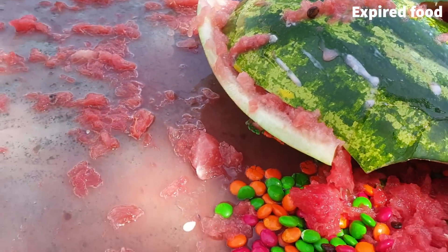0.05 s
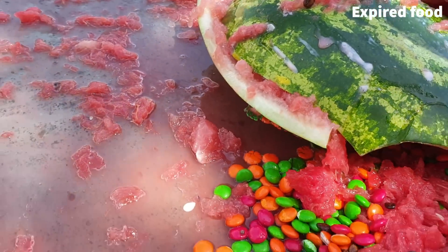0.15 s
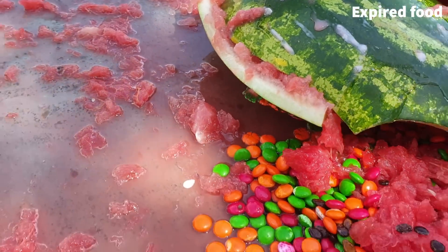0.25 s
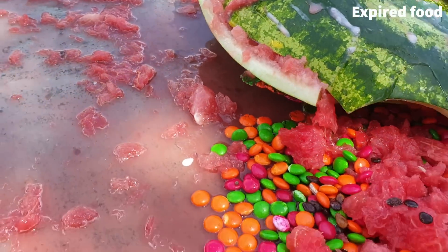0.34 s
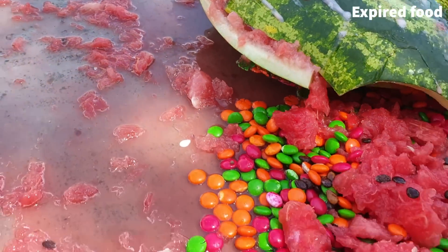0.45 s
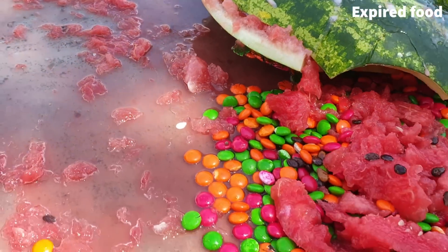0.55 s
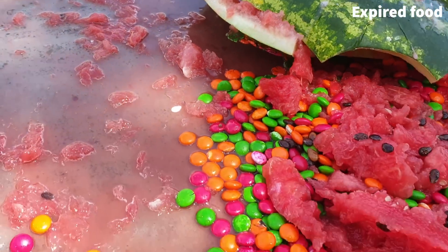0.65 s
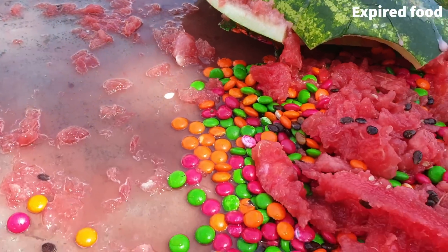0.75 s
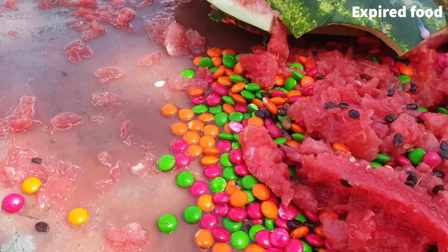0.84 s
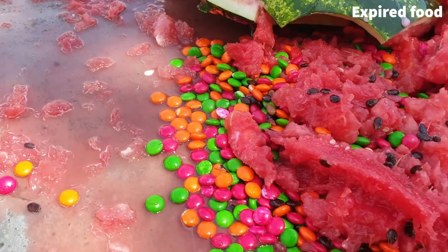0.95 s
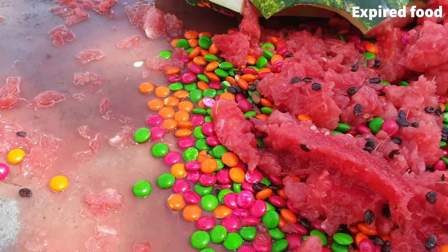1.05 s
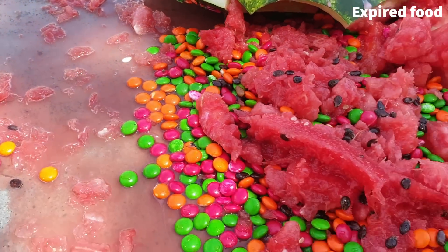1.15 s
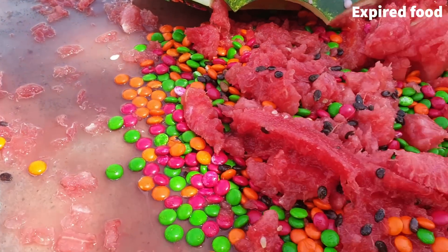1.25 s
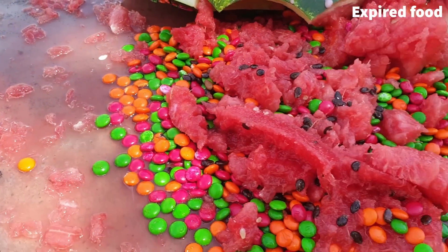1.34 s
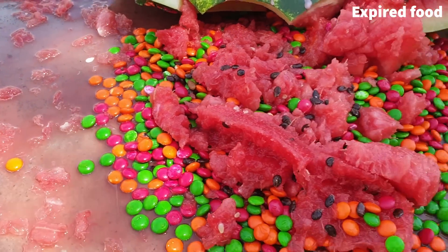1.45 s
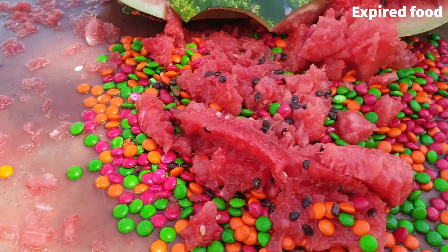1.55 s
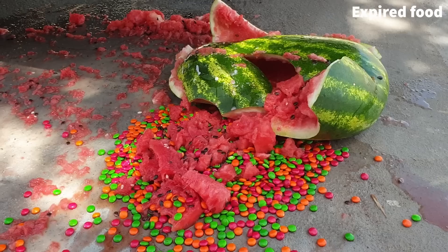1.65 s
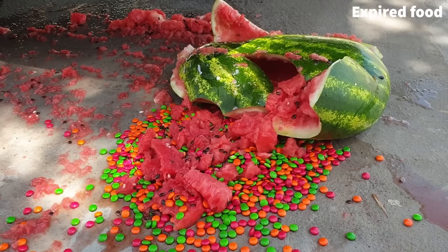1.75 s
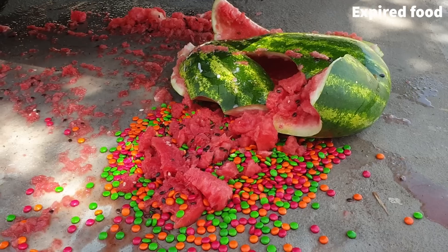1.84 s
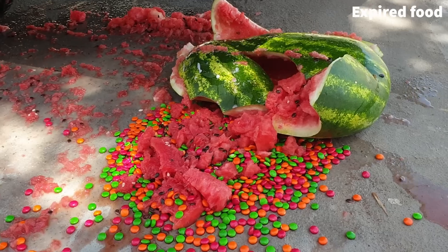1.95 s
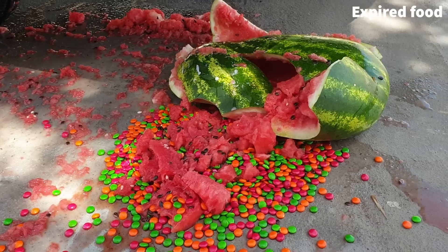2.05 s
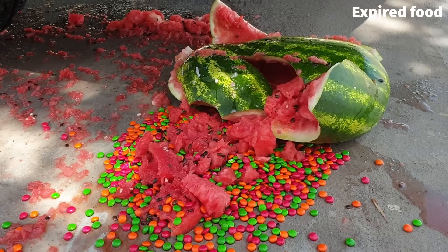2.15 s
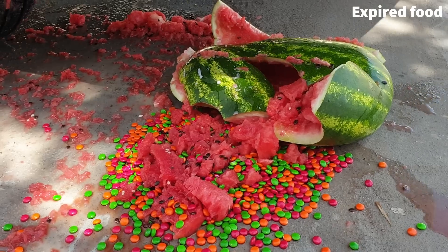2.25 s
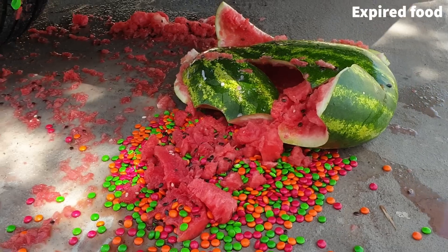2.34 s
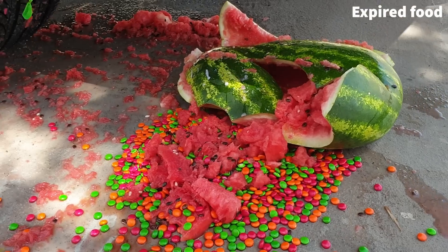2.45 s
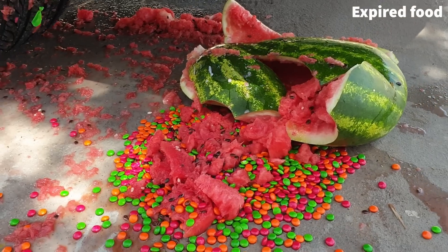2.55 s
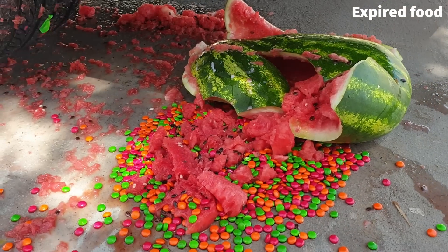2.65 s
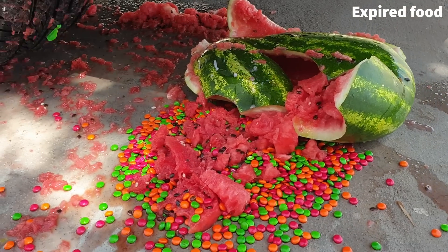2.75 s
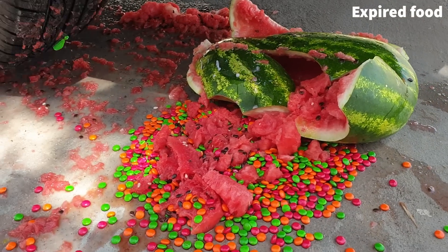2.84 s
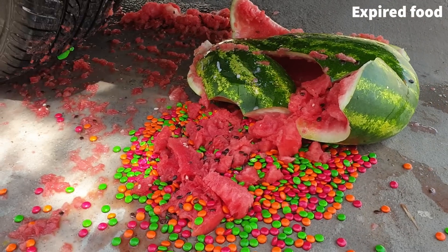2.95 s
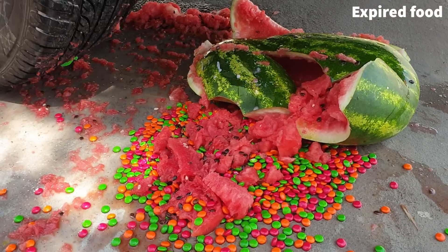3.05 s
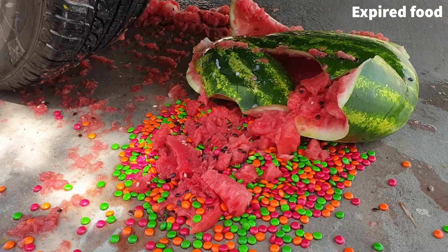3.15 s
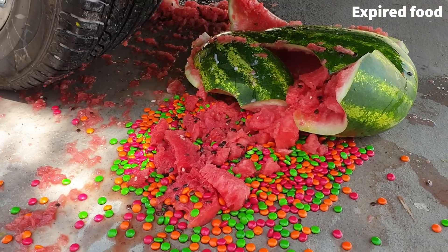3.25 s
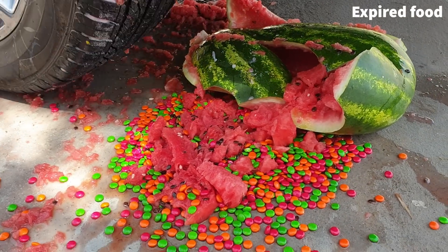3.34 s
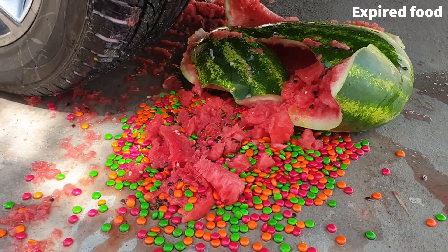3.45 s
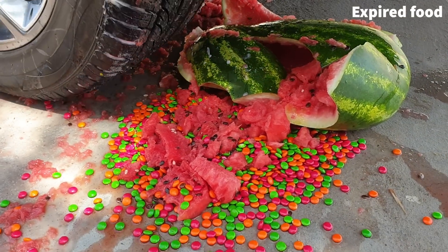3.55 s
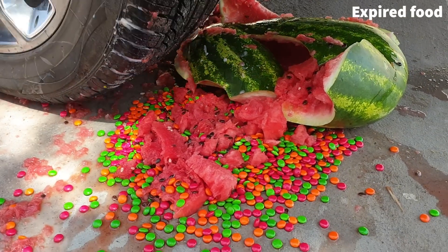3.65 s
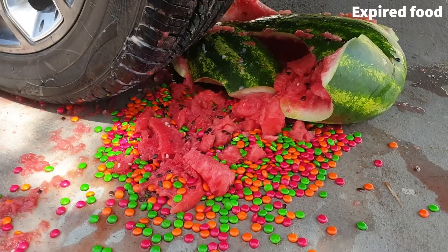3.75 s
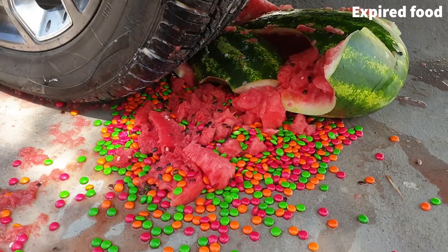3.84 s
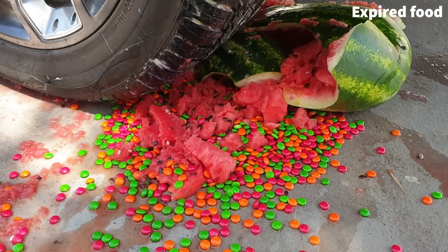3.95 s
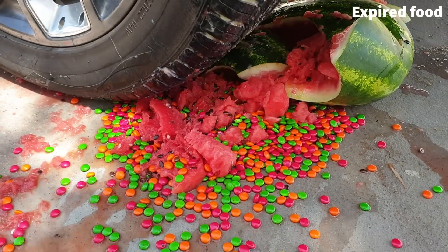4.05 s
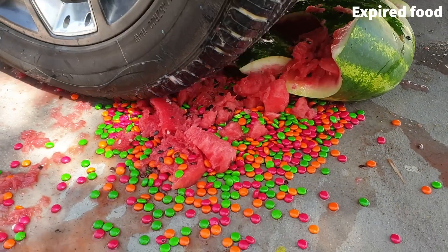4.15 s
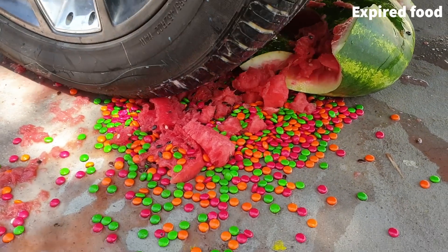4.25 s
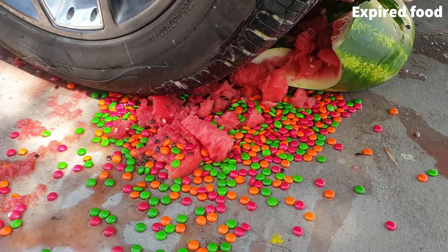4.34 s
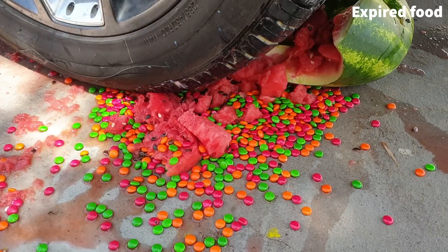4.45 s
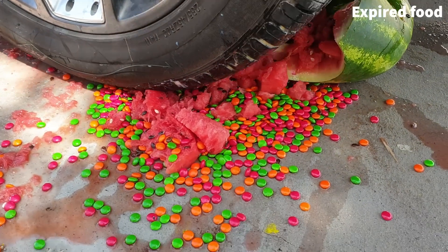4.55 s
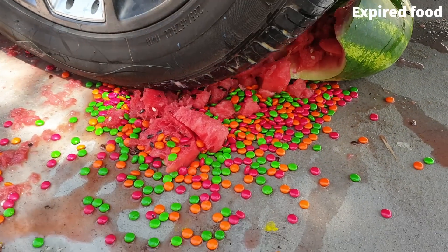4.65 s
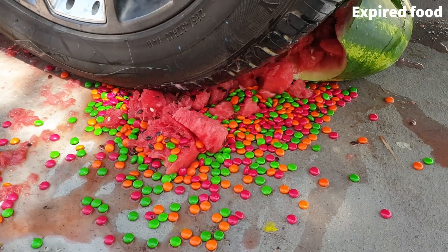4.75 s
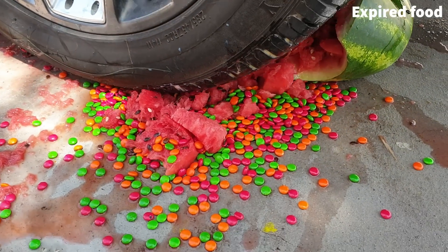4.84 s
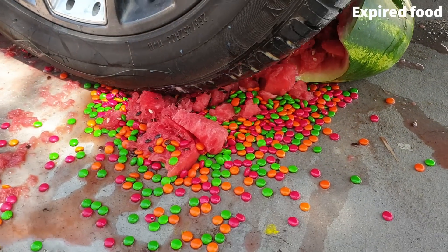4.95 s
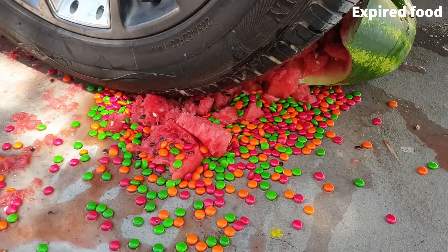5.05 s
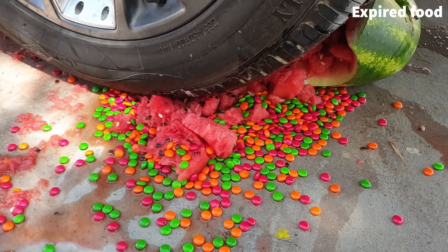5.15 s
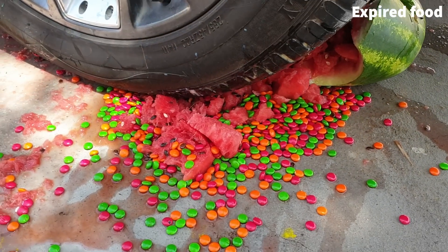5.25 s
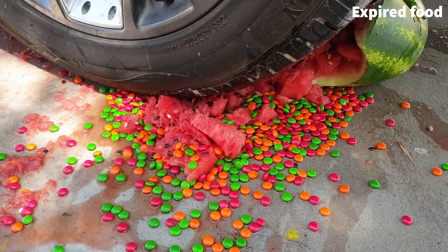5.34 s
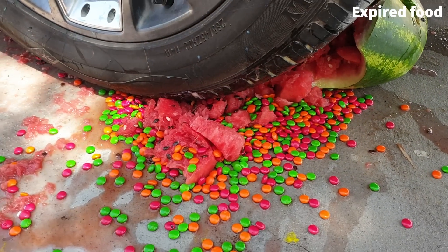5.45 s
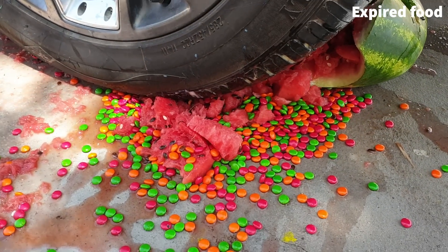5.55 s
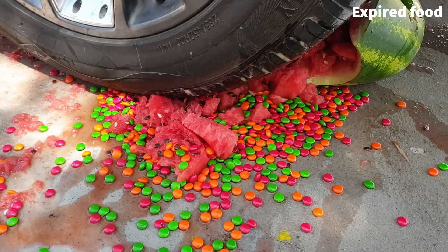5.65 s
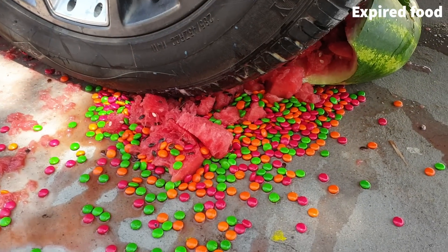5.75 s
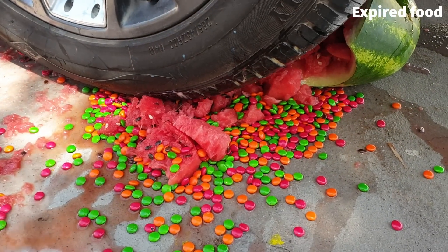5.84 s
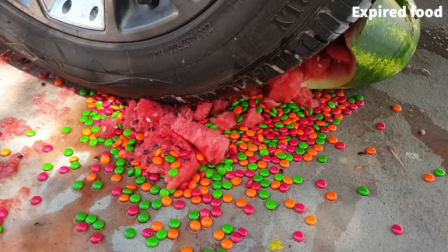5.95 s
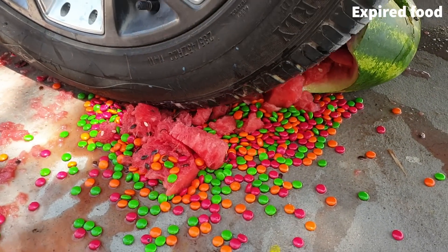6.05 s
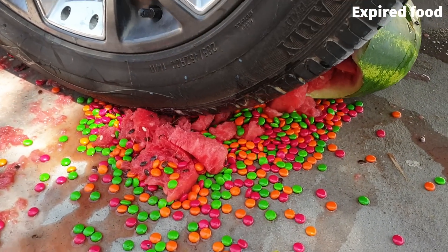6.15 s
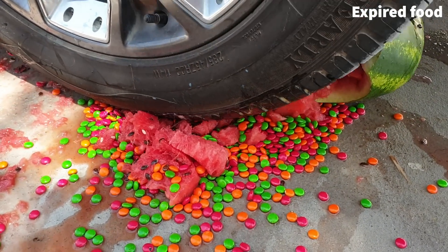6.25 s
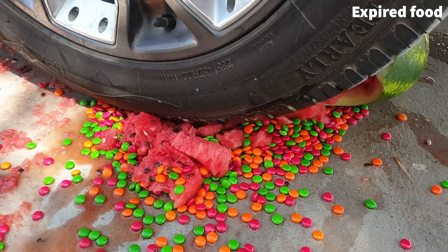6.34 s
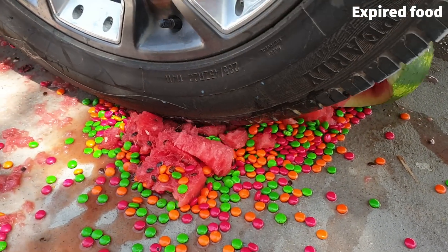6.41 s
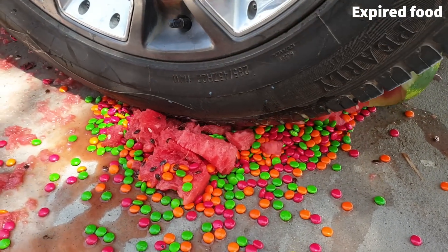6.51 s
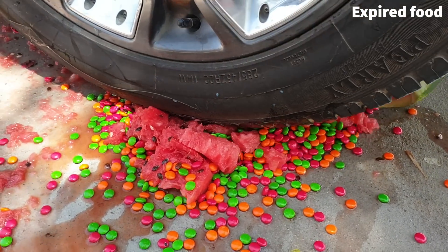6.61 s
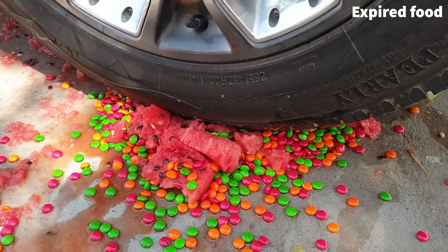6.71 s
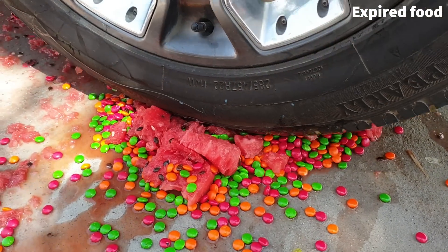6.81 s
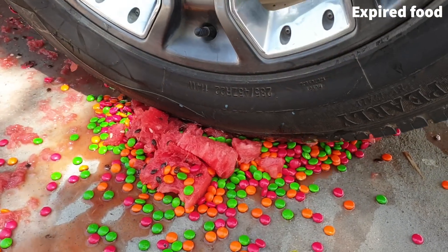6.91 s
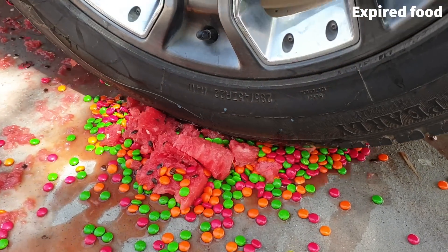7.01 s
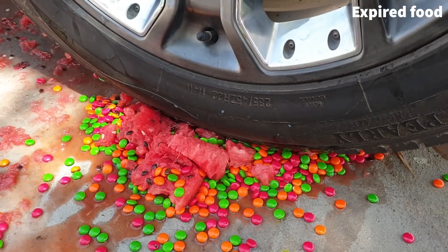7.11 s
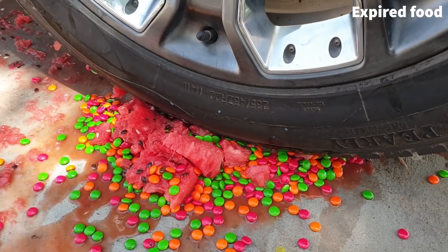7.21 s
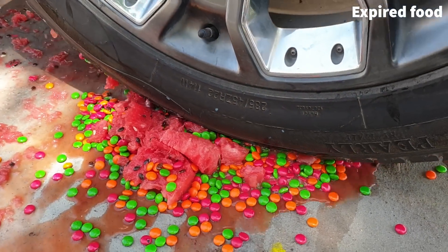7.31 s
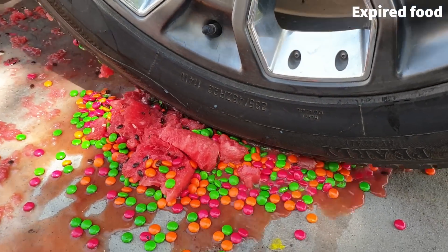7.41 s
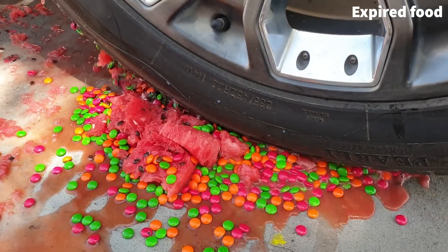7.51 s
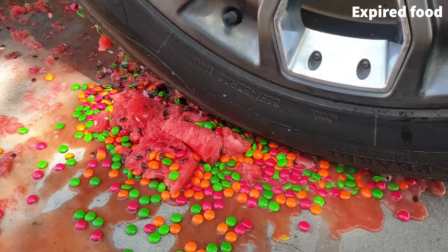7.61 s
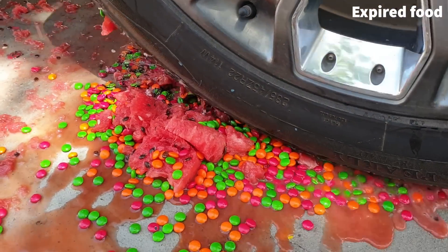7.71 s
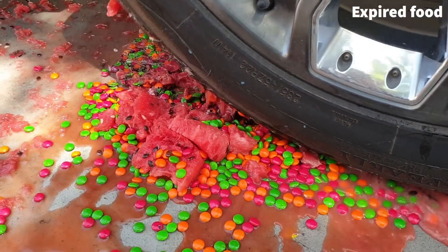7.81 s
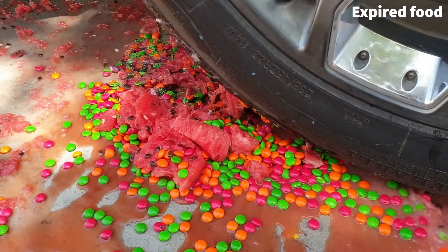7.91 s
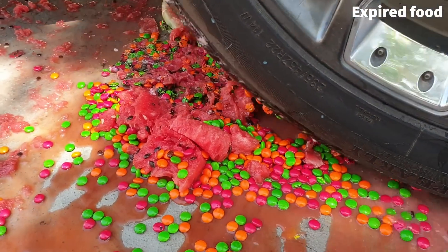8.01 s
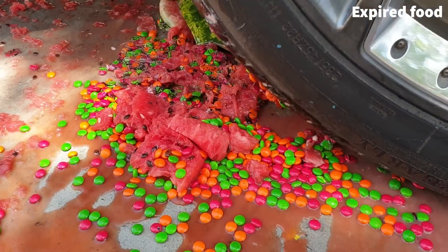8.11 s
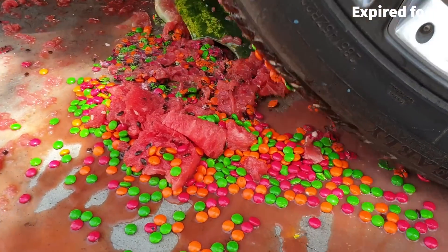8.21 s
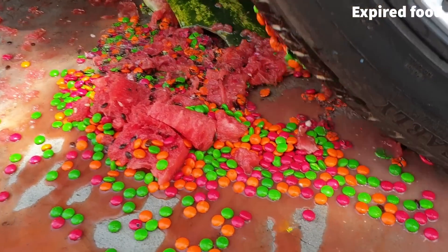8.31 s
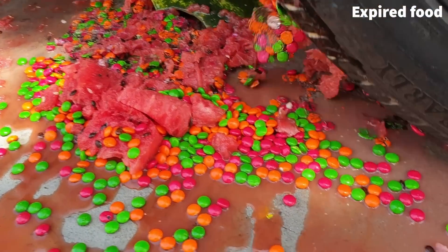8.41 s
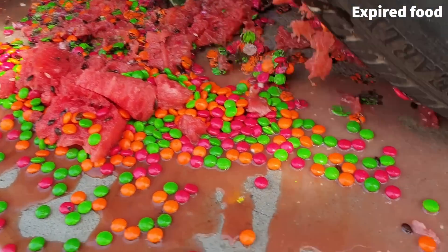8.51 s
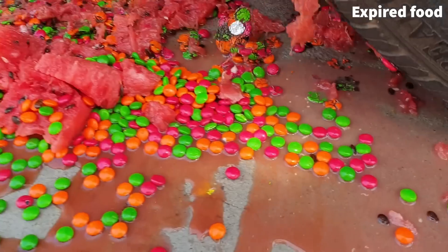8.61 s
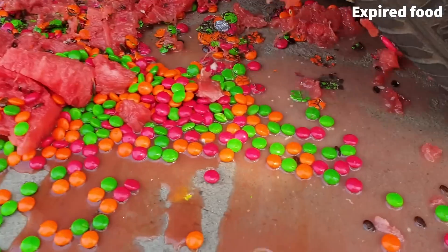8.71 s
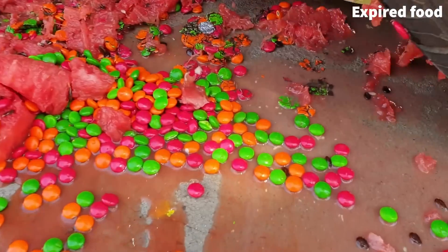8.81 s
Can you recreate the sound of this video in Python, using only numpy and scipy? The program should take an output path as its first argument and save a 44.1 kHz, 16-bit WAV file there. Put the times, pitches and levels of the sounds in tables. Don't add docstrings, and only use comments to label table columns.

```python
import sys
import numpy as np
from scipy import signal
from scipy.io import wavfile
from scipy.ndimage import uniform_filter1d

SR = 44100
rng = np.random.default_rng(int(sys.argv[2]) if len(sys.argv) > 2 else 0)


def undo_db(level):
    steps = np.asarray(level, float) / 20
    return 10 ** steps


def waveform_to_disk(signal):
    frames = np.transpose(np.atleast_2d(signal))
    scaled = np.clip(frames, -1, 1) * 32767
    samples = np.round(scaled).astype(np.int16)
    wavfile.write(sys.argv[1], SR, samples)


N = 391166
CUT_S = 1.68
PORT_LAG = (21, 13)
# time_s, level_db
THROTTLE = [(0, 0), (1.66, -4), (1.7, -1.5), (4.8, 1.5), (5.3, -2.5), (5.48, 4), (5.6, 11.5), (5.88, 16.5),
            (6.25, 10.5), (6.55, 6), (6.8, -2.5), (6.98, -1.5), (7.19, 12), (7.31, 1.5), (7.42, 11),
            (7.8, 3.5), (8.0, 1.5), (8.87, 2)]
# time_s, level_db
CRUSH = [(0, 4), (.6, 3.5), (1.62, 3.5), (1.75, 4.5), (2.25, 5.5), (2.6, 4.5), (3.88, 6), (4.05, 7),
         (4.3, 8.5), (4.5, 6.5), (4.75, 7.5), (4.95, 5), (5.75, 7.5), (6.82, 7), (7.3, 7.5), (7.55, 10.5),
         (7.86, 8.5), (8.1, 6.5), (8.87, 6.5)]


def in_time(rows, silent=False):
    s, *columns = np.transpose(rows)
    t = np.arange(N) / SR
    curves = [np.interp(t, s, column) for column in columns]
    if silent:
        curves.append(np.clip(np.minimum(t - s[0], s[-1] - t) / 0.0018, 0, 1))
    return curves


def at_hz(points, hz):
    points = np.array(points)
    return np.interp(np.log(hz), np.log(points[:, 0]), points[:, 1])


def before_change():
    return np.arange(N) < CUT_S * SR


def rms_one(x):
    return x / np.sqrt(np.mean(x ** 2) + 1e-20)


def drift(rate):
    r = np.exp(-32 * np.pi * rate / SR)
    slow = signal.lfilter([1], [1, -2 * r, r * r], rng.standard_normal(N // 16 + 4002))[4000:]
    return np.interp(np.arange(N) / 16, np.arange(len(slow)), rms_one(slow - slow.mean()))


def peak(x, hz, width_hz):
    r = np.exp(-np.pi * width_hz / SR)
    poles = [1, -2 * r * np.cos(2 * np.pi * hz / SR), r * r]
    return signal.lfilter([(1 - r * r) / 2, 0, (r * r - 1) / 2], poles, x)


def placed(x, pan_db, lag=PORT_LAG):
    first = before_change()
    late = np.where(first, *[np.roll(x, k) for k in np.broadcast_to(lag, 2)])
    lean = undo_db((pan_db + 1.3 * first) / 2)
    return np.array([x * lean, late / lean])


def tone(hz, level_db, gate, wobble_hz, flutter_db, rate, lead=0):
    turns = np.cumsum(hz + wobble_hz * drift(rate)) / SR
    level = undo_db(level_db + flutter_db * drift(rate))
    return np.sqrt(2) * gate * level * np.sin(2 * np.pi * turns + lead)


def hums():
    # time_s, pitch_hz, level_db
    rotors = [
        [(0.1, 625.5, -70), (0.524, 617.5, -62.5), (1.66, 627.5, -65)],
        [(1.7, 406, -67.5), (3.95, 404.2, -66.5), (4.9, 397.5, -74)],
        [(1.7, 244.3, -68), (4.05, 242.7, -72), (5.2, 240, -70)],
        [(7.3, 265.3, -65.5), (7.55, 260, -54), (7.8, 260.7, -63.5), (8.87, 263, -51.5)],
        [(6.45, 582, -66), (6.8, 550, -71), (7.05, 543, -68)],
        [(7.9, 533, -67), (8.87, 530, -75.5)],
        [(7.9, 924, -83.5), (8.87, 921, -69)],
        [(7.9, 2270, -69), (8.87, 2283, -71)],
        [(1.8, 438.7, -80), (5, 432.4, -72.5)],
    ]
    lines = [tone(*in_time(rotor, True), wobble_hz=2.45, flutter_db=2.0, rate=6.75) for rotor in rotors]
    return placed(sum(lines), 1.5)


def camshaft():
    # time_s, firing_hz
    firing_speed = [(0.0, 34.94), (0.43, 34.31), (1.67, 34.35), (1.69, 35.54), (2.08, 36.09), (3.2, 35.81),
                    (3.82, 36.41), (4.48, 36.1), (4.92, 35.08), (5.16, 35.36), (5.44, 37.9), (5.74, 51.31),
                    (5.99, 56.99), (6.31, 54.58), (6.81, 38.07), (7.12, 40.88), (8.08, 38.38),
                    (8.87, 39.88)]
    start_turns = (.106, .036)
    firing_hz = in_time(firing_speed)[0]
    return firing_hz, np.cumsum(firing_hz) / (8 * SR) + np.where(before_change(), *start_turns)


def engine_bay(cam):
    # pitch_hz, level_db (per Hz)
    colour_first = [(170, -7), (260, -7), (344, -14), (600, -9), (1130, -14), (1600, -10.5), (2300, -15.5),
                    (3100, -20.5), (4500, -28), (7200, -32), (10300, -28), (16000, -36.5)]
    # pitch_hz, level_db (per Hz)
    colour_second = [(170, -15), (258, -10.5), (331, -19.5), (392, -16.5), (749, -15.5), (1080, -19.5),
                     (2300, -16), (3900, -28), (6930, -33.5), (10100, -32), (16000, -37)]
    # pitch_hz, correlation (0-1)
    likeness = [
        [(60, .99), (300, .92), (800, .85), (2000, .78), (4500, .4), (14000, .35)],
        [(60, .99), (300, .9), (800, .62), (2000, .3), (4500, .2), (14000, .15)],
    ]
    # pitch_hz, pan_db
    leaning = [(60, 2.4), (2000, 2.6), (14000, 1.6)]
    # pitch_hz, level_db (in the band)
    rumble = [(28, -87), (50, -64), (100, -68), (140, -69)]
    bay_lag = (21, 9)
    # rest_db, follows_throttle (dB per dB), follows_crush (dB per dB)
    bay_law = [
        (-58, 0.41, 1.26),
        (-70, 0.41, 1.37),
        (-79.5, 0.2568, 1.7658),
    ]

    throttle_db, crush_db = in_time(THROTTLE)[0], in_time(CRUSH)[0]
    body_db, clatter_db, hiss_db = [db + a * throttle_db + b * crush_db for db, a, b in bay_law]
    first = before_change()
    grit_size = undo_db(2.5 * np.minimum(rng.exponential(1, N), 2.4))
    grit = 1 + 2.4 * (rng.random(N) < 400 / SR) * grit_size
    white = rng.standard_normal((2, 2, N)) * grit
    together = drift(21)
    beat = np.cos(2 * np.pi * 3 * cam)
    low_edges = 20 * 2 ** np.arange(0, 9.7, .4)
    high_edges = np.minimum(low_edges[1:], 16000)
    out = 0
    for k, (low, high) in enumerate(zip(low_edges, high_edges)):
        hz = np.sqrt(low * high)
        sos = signal.butter(2, [low, high], "band", fs=SR, output="sos")
        mid, side = signal.sosfilt(sos, white[k % 2])
        alike = (1 + np.where(first, *[at_hz(curve, hz) for curve in likeness])) / 2
        share = [at_hz([(450, a), (2000, b), (6000, c)], hz) for a, b, c in np.eye(3)]
        swell_db = share[0] * (body_db + 60) + share[1] * (clatter_db + 64) + share[2] * (hiss_db + 72)
        colour_db = np.where(first, at_hz(colour_first, hz), at_hz(colour_second, hz)) - 38
        if hz < 160:
            colour_db = at_hz(rumble, hz) - 10 * np.log10(2 * (high - low) / SR)
        patch_db = 1.4 * drift(10.2) + (0.36 * together + 1.9 * beat) * min(hz / 2500, 1)
        gain = undo_db(colour_db + swell_db + patch_db)
        pan_db = at_hz(leaning, hz)
        out = out + placed(gain * np.sqrt(alike) * mid, pan_db, bay_lag)
        out = out + placed(gain * np.sqrt(1 - alike) * side, pan_db, bay_lag) * [[1], [-1]]
    return out


def exhaust(firing_hz, cam):
    # pitch_hz, level_db
    pipe = [(47, -7), (58, 1.5), (80, 1.5), (95, -2), (103, -14.5), (109, -12.5), (119, -3), (142, -10.5),
            (162, -2)]
    # order, level_db
    order_sets = [
        [(8, 0)],
        [(16, 0)],
        [(11, 0), (13, 0)],
        [(19, 0), (21, -11), (24, 0), (27, -11), (29, -17), (32, -11)],
        [(44, 0), (54, -3), (88, 1), (109, -1), (126, -3)],
    ]
    # idle_db, follows_throttle (dB per dB), loss_db (per firing/s above the knee), coast_db (lost coasting)
    exhaust_law = [
        (-55, 1.45, 0, 2.5),
        (-45.5, 1.0037, 0.23, -1.5),
        (-51.5, 1.08, 0.01, 0.7),
        (-46.5, 1.0754, 1.38, 5),
        (-78.5, 0.8833, -0.67, 1),
    ]

    throttle_db = in_time(THROTTLE)[0]
    racing = np.maximum(firing_hz - 36.4, 0)
    slowing = uniform_filter1d(-np.gradient(firing_hz) * SR, size=4000)
    coasting = np.clip(slowing / 30, 0, 1)
    out = 0
    for (idle_db, follows, loss_db, coast_db), orders in zip(exhaust_law, order_sets):
        gains = np.array([undo_db(db + at_hz(pipe, order * firing_hz / 8)) for order, db in orders])
        part_db = idle_db + follows * throttle_db - loss_db * racing - coast_db * coasting
        gains = gains * undo_db(part_db) / np.sqrt(np.sum(gains ** 2, axis=0) / 2)
        for gain, (order, _) in zip(gains, orders):
            uneven = undo_db((.4 + order / 40) * drift(4))
            jitter = order / 200 * drift(4 + order / 10)
            out = out - gain * uneven * np.cos(2 * np.pi * order * cam + jitter)
    return placed(out, 2.7)


def crackle():
    sizes = undo_db(2.5 * np.minimum(rng.exponential(1, N), 3.0)) * rng.choice([-1, 1], N)
    born = rng.random(N) < 600 * undo_db(4 * drift(8)) / SR
    dealt = rng.integers(0, 10, N)
    out = 0
    for k, hz in enumerate(np.geomspace(600, 3300, num=10)):
        clicks = sizes * born * (dealt == k) + 1e-18
        ring = rms_one(peak(clicks, hz, 2.26 * hz / 9.2))
        out = out + placed(ring, (2, -1, 4)[k % 3], (12, -6, 3, -14)[k % 4])
    return undo_db(-87 + 3.44 * in_time(CRUSH)[0]) * rms_one(out)


def contact(burst, echo, s):
    # time_s, lag_samples
    contact_lag = [(1.6, 20), (2.2, -20), (2.9, 14), (4.3, 5), (6.4, -3), (7.9, -9)]
    lag = round(np.interp(s, *np.transpose(contact_lag)))
    return np.array([burst, .8 * np.roll(burst, lag) + .5 * echo])


def snaps():
    # start_s, peak_db, pitch_hz, crack_db, ring_s
    fractures = [(1.373, -62, 3000, -21, 0.043), (3.569, -64, 5450, -15, 0.065),
                 (2.215, -59, 1930, -27, 0.23), (2.969, -58.5, 5000, -20, 0.041),
                 (3.7544, -73.5, 2700, 15, 0.023), (3.834, -67, 2430, 5, 0.027),
                 (4.158, -57, 2170, -14, 0.1), (4.225, -63, 1890, -10, .08),
                 (4.3067, -64.5, 1760, 6.5, 0.035), (4.447, -59, 2220, -16, 0.039),
                 (4.521, -69, 2530, -14, 0.046), (4.7162, -65, 1820, -6, 0.072),
                 (5.048, -58.5, 2560, -20, 0.041), (5.2634, -65, 1860, -11, 0.035),
                 (6.481, -58, 2400, -23, 0.021), (6.592, -54.5, 1760, -25, 0.023),
                 (7.1457, -51.5, 2840, -4, 0.04), (7.247, -53, 2700, -8.5, 0.035),
                 (7.3562, -57.5, 3780, 14, 0.04), (7.3993, -31, 3900, -17, 0.066),
                 (7.424, -52.5, 4220, -20, 0.034), (7.486, -54.5, 4580, -6, 0.038),
                 (7.5176, -45, 2100, -19, 0.029), (7.651, -47, 2200, -24, .03),
                 (7.6684, -45, 1950, -9.5, 0.031), (7.675, -53.5, 2700, -8, .03),
                 (7.784, -64, 5200, 7, 0.061), (6.412, -60, 4230, -6, .06), (7.494, -53.5, 4000, -8.5, .04),
                 (4.745, -63, 2000, -10, .08)]
    # start_s, peak_db, pitch_hz
    dry_ticks = [(1.3608, -66, 3040), (2.172, -50.5, 2800), (2.2303, -44, 3050), (2.2832, -67, 2860),
                 (2.4634, -48, 3360), (2.959, -64, 5110), (3.41, -50, 3000), (3.47, -55, 2500),
                 (3.525, -49.5, 2990), (3.62, -54, 3200), (4.52, -47, 3300), (7.95, -49.5, 8000),
                 (3.6965, -53, 5910), (3.907, -59, 3230), (5.332, -55, 3190), (5.9459, -55, 3300),
                 (6.1993, -57, 3330), (6.324, -67, 3220), (6.6218, -55, 4640), (7.2315, -50, 2950),
                 (7.379, -43, 4060), (7.418, -37, 4050), (7.5976, -48, 3100), (7.6395, -41.5, 3400),
                 (7.756, -46, 2000), (7.8294, -51.5, 6800), (8.0406, -48, 3530), (8.5824, -48, 3240)]
    out, t = np.zeros((2, N)), np.arange(SR // 5) / SR
    rows = fractures + [(s, db - 13, hz, -6.5, 0.029) for s, db, hz in dry_ticks]
    bursts = rng.standard_normal((len(rows), 2, len(t)))
    for (s, peak_db, hz, crack_db, ring_s), (burst, echo) in zip(rows, bursts):
        fade = np.minimum(t / 0.00058, 1) * undo_db(-60 * t / np.clip(ring_s, .004, .3))
        sides = contact(burst * fade, echo * fade, s)
        body = peak(peak(sides, hz, .22 * hz), hz, .45 * hz)
        body = body + .2 * peak(peak(sides, 1.7 * hz, .6 * hz), 1.7 * hz, .9 * hz)
        crack = peak(sides, 6000, 7600)
        sound = body / abs(body).max() + undo_db(crack_db) * crack / abs(crack).max()
        i = round(s * SR)
        out[:, i:i + len(t)] += undo_db(peak_db + 13.5) * sound[:, :N - i]
    return out


def knocks():
    # start_s, peak_db, pitch_hz (lowest mode), ring_s
    blows = [(6.412, -29, 778, 0.064), (6.81, -48.5, 770, 0.05), (7.001, -39, 794, 0.06),
             (7.025, -45, 853, .07), (7.115, -41, 850, 0.058), (7.1466, -38, 760, 0.028),
             (7.353, -35, 600, 0.09), (7.399, -34, 780, 0.044), (7.9405, -44, 1140, 0.065),
             (3.975, -46, 944, 0.057), (.429, -56, 600, 0.035), (4.083, -42.5, 855, .04),
             (7.807, -45, 816, 0.047), (7.518, -39, 1010, .04), (7.827, -40.5, 970, .04),
             (3.835, -55, 695, .04), (4.152, -48, 700, .04), (4.441, -44, 637, .04), (4.557, -49, 730, .04),
             (4.712, -46, 710, 0.066), (6.93, -56, 600, .04)]
    # ratio (to the lowest mode), level_db
    rind = [(1, 0), (1.19, 2), (1.45, -1), (1.66, -9), (1.87, -4), (2.28, -11)]
    out, t = np.zeros((2, N)), np.arange(SR // 5) / SR
    chance = rng.random((len(blows), len(rind), 2))
    echoes = rng.standard_normal((len(blows), len(t)))
    for (s, peak_db, low_hz, ring_s), modes, echo in zip(blows, chance, echoes):
        body = 0
        for (ratio, db), (odd, turn) in zip(rind, modes):
            decay_db = 60 * t * ratio ** 0.27 / np.clip(ring_s, .01, .3)
            mode = np.sin(2 * np.pi * (low_hz * ratio * t + turn))
            body = body + undo_db(db + 4 * (odd - .5) - decay_db) * mode
        body = body * np.minimum(t / 0.00059, 1)
        body = body * (1 + .3 * uniform_filter1d(echo, size=20))
        sound = contact(np.pad(body, (30, 0))[:len(t)], 0.21 * np.roll(body, 150), s)
        i = round(s * SR) - 30
        out[:, i:i + len(t)] += undo_db(peak_db) * sound / abs(sound).max()
    return out


def squirts():
    # time_s, level_db (1-9 kHz), thud_db (above that)
    jets = [
        [(.018, -41, -11), (.024, -42.5, -1), (.05, -39.5, -6), (.08, -53, 5), (.13, -71, -24)],
        [(.42, -76, -12), (.5, -67, -12), (.56, -57.5, -29), (.65, -60.5, -23), (.68, -50, -20),
         (.688, -56, -20), (.696, -50, -22), (.74, -77, -10)],
        [(7.352, -61, 0), (7.356, -37, -9), (7.376, -34.5, -8.5), (7.397, -45.5, -1), (7.4, -35, -18.5),
         (7.414, -43, -16), (7.423, -38, -19), (7.45, -50, -6.5), (7.51, -62.5, 3)],
    ]
    # pitch_hz, width_hz, level_db
    jet_peaks = [
        [(1760, 1700, -2), (3930, 490, -15), (7060, 590, -10.5), (9500, 1500, -6.5)],
        [(2100, 630, -6), (4260, 1300, -10.5), (8400, 1700, -17), (10300, 3800, -10.5)],
        [(1010, 860, 10), (3830, 2400, 13), (6320, 13000, 10), (2230, 2000, 10)],
    ]
    jet_lags = (21, -20, 1)
    white = rng.standard_normal((2, N)) * undo_db(2.8 * drift(120))
    out = 0
    for jet, peaks, lag, alike in zip(jets, jet_peaks, jet_lags, (.8, .75, .35)):
        right = alike * np.roll(white[0], lag) + np.sqrt(1 - alike ** 2) * white[1]
        noise = np.array([white[0], right])
        thud = rms_one(peak(peak(noise, 500, 220), 500, 300))
        level_db, thud_db, gate = in_time(jet, True)
        bands = [undo_db(db) * rms_one(peak(peak(noise, hz, w), hz, 2 * w)) for hz, w, db in peaks]
        out = out + gate * undo_db(level_db) * (rms_one(sum(bands)) + undo_db(thud_db) * thud)
    return out


def drag():
    # start_s, length_s, pitch_hz (at first), level_db
    grabs = [(0.525, 0.12, 10000, -85), (0.625, 0.23, 10220, -65), (.88, 0.38, 10070, -73),
             (1.085, 0.4, 10100, -68.5), (1.327, 0.14, 10170, -64.5), (1.544, 0.51, 10140, -70),
             (1.955, 0.2, 10100, -69.5), (2.118, 0.24, 10100, -72.5), (2.306, 0.19, 10160, -70),
             (2.6, 0.27, 10070, -72), (2.887, 0.28, 10140, -72), (3.522, 0.37, 10140, -75),
             (3.71, 0.17, 9970, -74), (3.829, 0.14, 10250, -64.5), (3.99, 0.28, 10120, -70),
             (4.384, .18, 10140, -67), (4.566, 0.068, 10160, -64), (4.677, 0.12, 10040, -63),
             (5.016, 0.28, 10150, -69.5), (8.07, 0.082, 10070, -78), (8.19, .08, 9970, -79),
             (8.304, 0.42, 10080, -84)]
    edge_db = 7.5
    hz, level_db, gate = np.full(N, 10050.), np.full(N, -90.), np.zeros(N)
    for s, length_s, first_hz, db in grabs:
        part = slice(round(s * SR), round((s + length_s) * SR))
        done = np.linspace(0, 1, part.stop - part.start)
        hz[part] = first_hz - 156 * done ** 2
        fall_db = np.interp(done, [0, 0.1, 1], [edge_db, 0, edge_db])
        level_db[part] = db - fall_db ** 2 / edge_db
        gate[part] = 1
    hz, level_db, gate = uniform_filter1d([hz, level_db, gate], size=600)
    return placed(tone(hz, level_db, gate, wobble_hz=27.0, flutter_db=4.0, rate=28.6), 9.7, lag=1)


def squeals():
    # time_s, pitch_hz, level_db, pan_db (left over right)
    glides = [
        [(1.678, 11690, -90, 16), (1.684, 11800, -61, 18), (1.713, 11600, -44, 12), (1.738, 11530, -49, 2),
         (1.779, 11520, -50, 7), (1.802, 11680, -65, 7), (1.84, 11600, -82, -1)],
        [(4.67, 11900, -73, 6), (4.691, 11840, -43, 10), (4.722, 11500, -31, 10), (4.74, 11200, -26, 7.5),
         (4.789, 10870, -50, 10), (4.82, 10900, -53, 3), (4.93, 10880, -89, 7)],
        [(4.816, 10550, -36, 7), (4.829, 10200, -42, 11.5), (4.872, 10180, -49.5, 21), (4.9, 10100, -53, 13),
         (4.918, 9900, -70, 11), (4.935, 10120, -57, 17), (4.97, 10040, -81, 2)],
        [(7.386, 10400, -40, 0), (7.397, 10600, -30, 2), (7.408, 10700, -28, 2), (7.418, 10690, -25, -3),
         (7.428, 10670, -18, 0), (7.438, 10300, -35, 4), (7.455, 10460, -40, 0.5)],
    ]
    glide_lags = (1, 17, 2, 9)
    out = 0
    for glide, lag in zip(glides, glide_lags):
        hz, level_db, pan_db, gate = in_time(glide, True)
        sound = tone(hz, level_db - .2, gate, wobble_hz=24, flutter_db=1.6, rate=70)
        out = out + placed(sound, pan_db, lag)
    return out


def screech():
    # time_s, pitch_hz, level_db, pan_db (left over right), lead_rad (of the left)
    bites = [
        [(7.358, 10500, -58, 1, .3), (7.363, 10330, -28, 2, .3), (7.373, 10250, -20, 4, 0),
         (7.381, 10180, -29, 3, 0), (7.39, 10330, -19, 4, .2), (7.405, 10470, -21, 5, 1.8),
         (7.416, 10460, -20, 8, 2.1), (7.428, 10780, -15, -3, 2.2), (7.442, 10920, -13.5, -3, 2.85)],
        [(7.463, 10950, -17.5, -2, 2.9), (7.478, 10980, -24, -4, 3.3), (7.492, 11030, -22, -4, 3.9),
         (7.504, 11110, -15.5, 2, 2.75), (7.525, 11180, -17, 6, 2.5), (7.538, 11220, -18.5, 1, 1.8),
         (7.555, 11250, -20, 5, -.2), (7.566, 11280, -21, 12, -1.1), (7.577, 11335, -25, 2, -1.3)],
        [(7.595, 11322, -20, -3, -1.3), (7.62, 11335, -19, -2, -1.2), (7.642, 11395, -20.5, 3, -2.6),
         (7.667, 11430, -23, -1, -2.3), (7.685, 11490, -26, -3, .5), (7.697, 11545, -35, -2, -.8),
         (7.718, 11590, -38, 6, -.7), (7.735, 11580, -29, -8, 2.8), (7.762, 11520, -27, -5, .4)],
        [(7.775, 11545, -21, -8, 0), (7.787, 11575, -33, -12, -1), (7.799, 11600, -33, -4, -2.6),
         (7.812, 11645, -25, 0, -3.9), (7.83, 11640, -31, 3, -4.3), (7.845, 11640, -35, 4, -3.7),
         (7.865, 11630, -52, 0, -5), (7.89, 11650, -76, 0, -5)],
    ]
    hz, level_db, pan_db, lead, gate = in_time(np.concatenate(bites), True)
    sides = np.array([[.5], [-.5]])
    share = undo_db(sides * pan_db) / np.sqrt(np.mean(undo_db(2 * sides * pan_db), axis=0))
    rasp = 1 + .08 * np.array([drift(220), drift(220)])
    return share * rasp * tone(hz, level_db, gate, wobble_hz=12, flutter_db=1.2, rate=70, lead=sides * lead)


def brakes():
    out = drag() + screech() + squeals()
    tail_s = np.arange(SR // 4) / SR
    tail = rng.standard_normal((2, SR // 4)) * undo_db(-60 * tail_s / .1)
    return out + undo_db(-43) * signal.fftconvolve(out, tail, axes=1)[:, :N]


def scene():
    firing_hz, cam = camshaft()
    background = hums() + engine_bay(cam) + exhaust(firing_hz, cam)
    crushing = crackle() + snaps() + knocks() + squirts()
    return background + crushing + brakes()


def roll_off(x):
    return signal.sosfilt(signal.butter(12, 15900, fs=SR, output="sos"), x)


def band(x, edges, kind):
    return signal.sosfiltfilt(signal.butter(6, edges, kind, fs=SR, output="sos"), x)


def record(dry):
    t = np.arange(N) / SR
    squeal = uniform_filter1d(np.mean(band(dry, [9700, 12200], "band") ** 2, axis=0), size=900)
    starved = np.clip((10 * np.log10(squeal + 1e-12) + 41) / 5, 0, .995)
    crack = uniform_filter1d(np.mean(band(dry, [2500, 8000], "band") ** 2, axis=0), size=900)
    quiet = np.clip((-40 - 10 * np.log10(crack + 1e-12)) / 2, 0, 1)
    starved = starved * quiet ** (t < 7.418)
    top = band(band(dry, 12700, "high"), 12700, "high")
    gap = starved ** 8 * (t < 7.67) * band(dry, [9050, 9600], "band")
    wet = band(dry - starved * (top + gap), 18, "high")
    wet = signal.sosfilt(signal.cheby2(12, 60, 16450, fs=SR, output="sos"), wet)
    return roll_off(wet)


dry = scene()
out = record(dry)
waveform_to_disk(out)
```